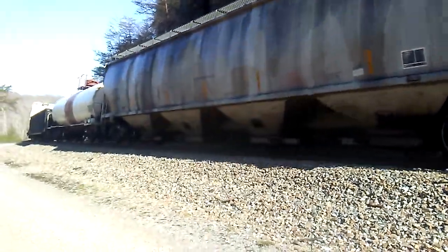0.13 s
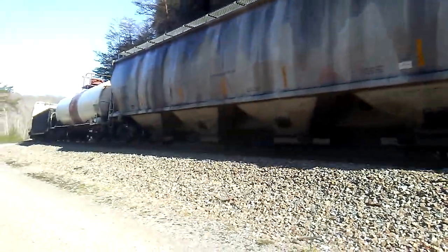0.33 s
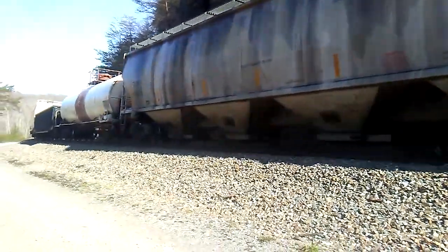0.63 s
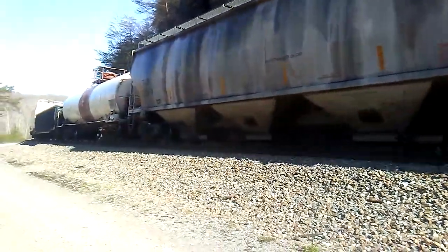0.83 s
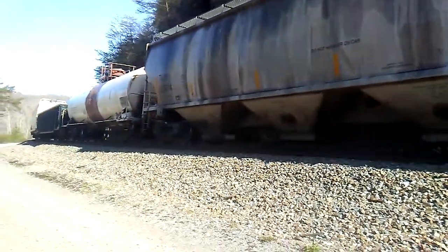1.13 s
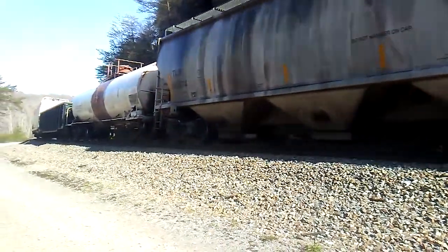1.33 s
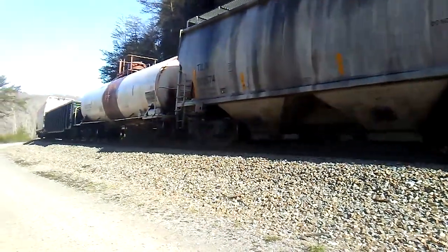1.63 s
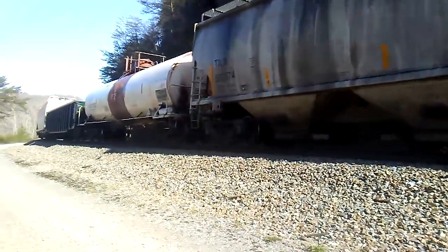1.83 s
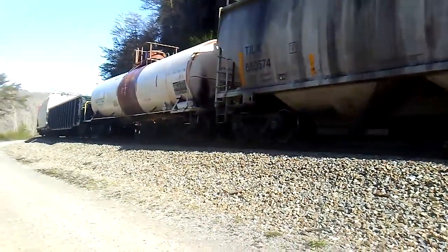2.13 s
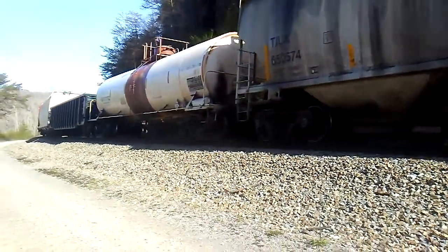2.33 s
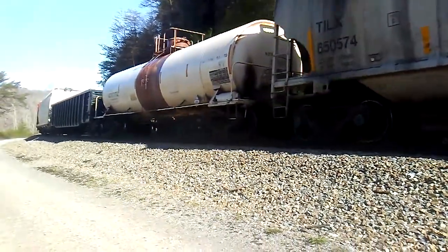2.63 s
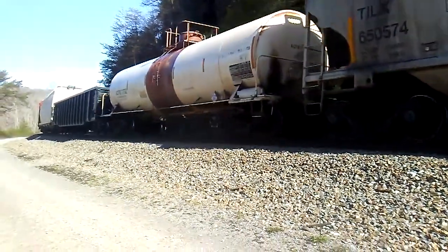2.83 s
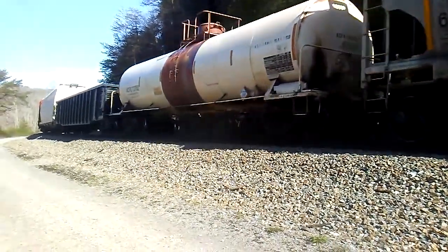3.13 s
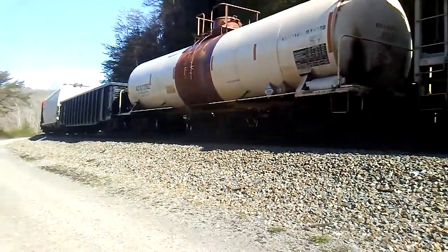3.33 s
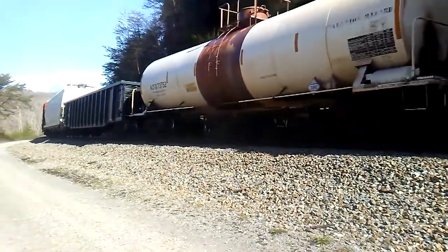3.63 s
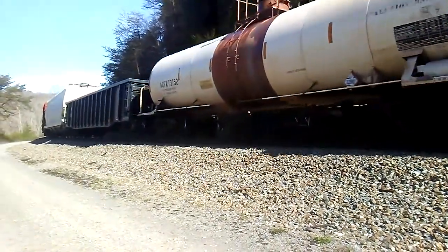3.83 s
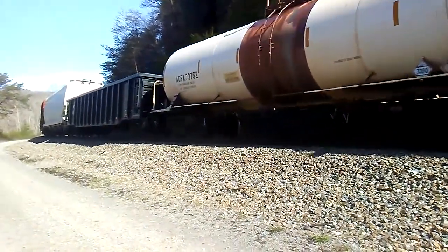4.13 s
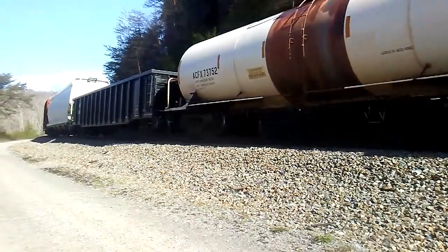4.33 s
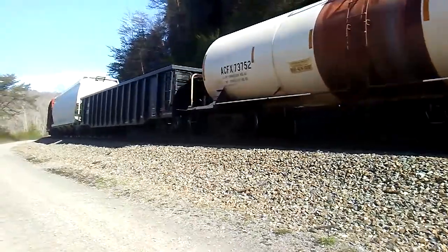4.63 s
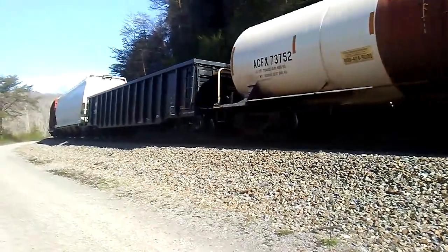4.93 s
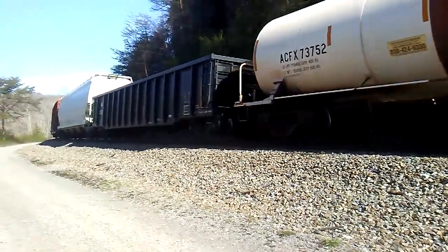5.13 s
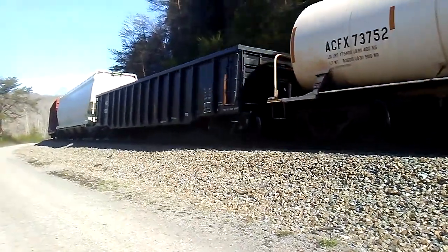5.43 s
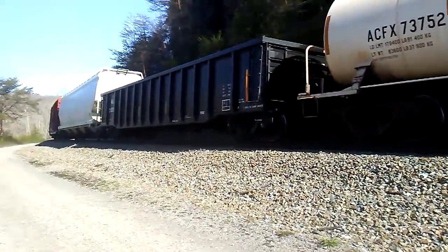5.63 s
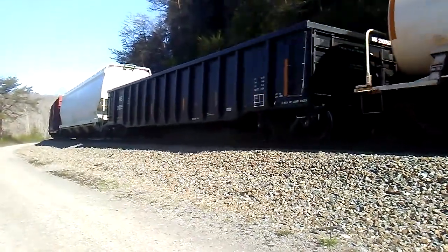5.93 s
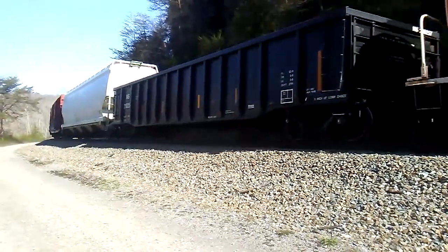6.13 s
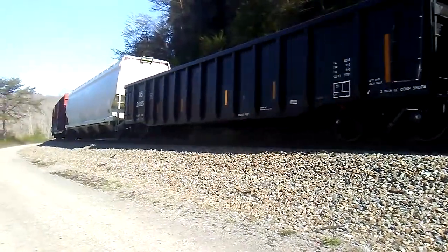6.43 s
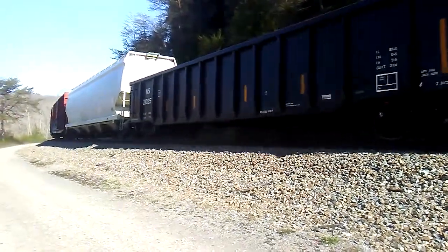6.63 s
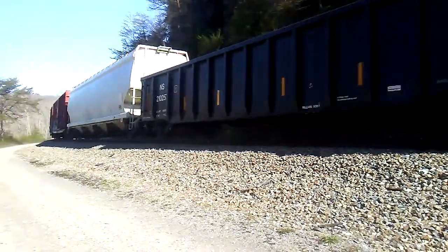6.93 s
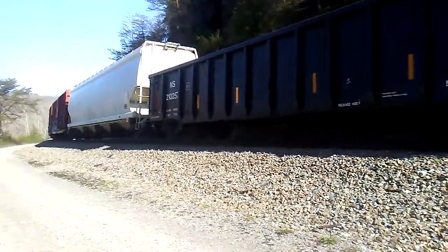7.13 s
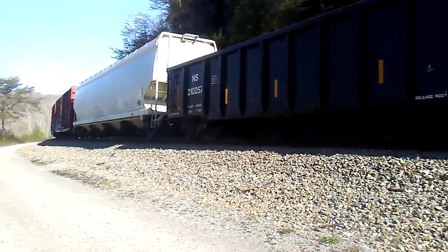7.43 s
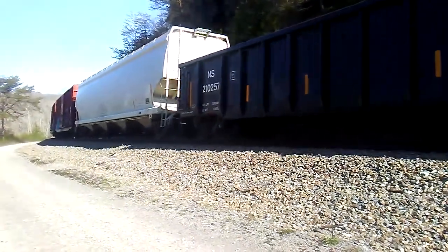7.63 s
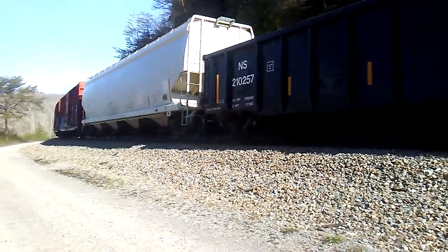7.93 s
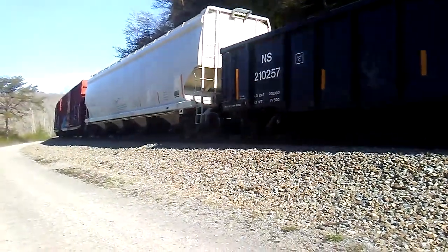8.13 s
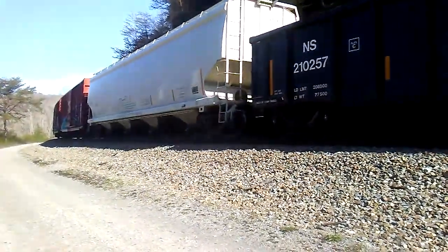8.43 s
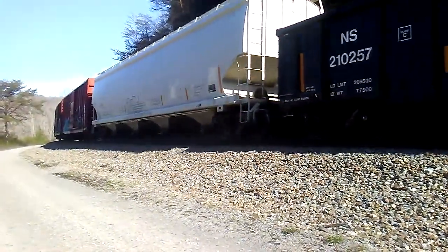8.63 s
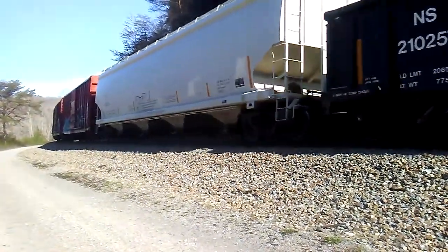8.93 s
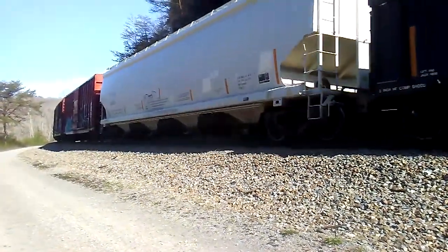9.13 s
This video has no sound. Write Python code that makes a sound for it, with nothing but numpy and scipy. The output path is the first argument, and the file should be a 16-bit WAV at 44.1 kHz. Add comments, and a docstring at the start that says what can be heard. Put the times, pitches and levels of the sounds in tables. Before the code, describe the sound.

Piercing, fluttering wheel squeals and harsh metallic grinding pass close by, then fade into low freight-train rumble with wind buffets and a few dull clanks.

```python
"""Slow freight train, close to the track

Freight cars roll slowly past a small camera whose microphone is 4 m from the squealing wheels at their nearest.
Coloured noise makes the ground rumble and the rail's roar; noise through resonances makes wheels ring and
gear clank. Flanges grind as swaying noise and lock into squeals, which are fluttering sine tones.
Random slaps on the microphone port make the gusts, and the camera limits and clips the loudest peaks."""
import sys
import numpy as np
from scipy import signal
from scipy.fft import rfft, irfft, next_fast_len
from scipy.io import wavfile
from scipy.ndimage import uniform_filter1d, minimum_filter1d, map_coordinates

SR = 44100
rng = np.random.default_rng(int(sys.argv[2]) if len(sys.argv) > 2 else 0)


def output_pcm(signal):
    """Save a mono or channel-first signal as 16-bit PCM at the path in sys.argv[1].

    Samples are clipped to [-1, 1] before scaling.
    """
    pcm = np.clip(np.atleast_2d(signal).T, -1, 1) * 32767
    wavfile.write(sys.argv[1], SR, np.round(pcm).astype(np.int16))


N = 409248

# gusts on the microphone: start_s, length_s, level_db
GUSTS = [(1.19, 1.17, -22.5), (1.54, 0.052, -12), (1.91, 0.087, -14.5), (2.969, 0.043, -18.5),
         (3.715, 0.23, -20.5), (7.176, 0.14, -19.5), (7.469, 0.043, -14.5), (7.531, .072, -12),
         (7.717, 0.13, -10.5), (7.847, 0.1, -8), (8.351, 0.081, -18)]
# spectrum of the gusts at the port: frequency_hz, density_db
BUFFET_SPECTRUM = [(30, -34), (70, -21), (170, -3), (260, 0), (420, -1.5), (620, -8.5), (1000, -18.5),
                   (2000, -51), (5000, -66)]
# spectrum of the rumble under the cars: frequency_hz, density_db
RUMBLE_SPECTRUM = [(25, -29), (42, -14), (62, -3), (95, -3.5), (135, -9.5), (180, 3), (225, 1.5), (330, 1),
                   (500, -10), (900, -13), (2000, -71)]
# rumble before its trim: time_s, level_db
RUMBLE_LEVEL = [(0, -26.5), (1.05, -29), (1.5, -22), (2.05, -22), (2.5, -24), (6.4, -25), (6.8, -21.5),
                (7.8, -23.5), (9.28, -25.5)]
# spectrum of the rail's roar: frequency_hz, density_db
ROAR_SPECTRUM = [(150, -23), (400, -5), (750, 2), (1050, 1), (1300, -3), (1700, -1.5), (2400, -3),
                 (3000, -8), (3800, -1.5), (4500, -29.5), (6500, -62), (12000, -53)]
# roar before its trim: time_s, level_db
ROAR_LEVEL = [(0.2, -19), (0.8, -31), (1.8, -18.5), (3.5, -20.5), (4.6, -25), (6.9, -25.5), (8.05, -30),
              (9.28, -25.5)]
# wheel modes rung by rolling: pitch_hz (wheel at rest), width_hz, relative_level_db
RIM_MODES = [(1595, 143, -5.5), (1908, 82, 2), (2193, 210, -7), (2588, 215, -5.5), (2774, 101, 4),
             (3340, 150, -7.5), (3540, 66, 1.5), (3857, 133, -5)]
# ringing of the wheels before its trim: time_s, level_db
RING_LEVEL = [(0, -6), (.8, -10), (1.5, -8), (2.95, -11.5), (3.3, -9.5), (3.7, -13), (5, -17), (6.65, -19),
              (7, -29.5), (8.05, -35), (8.25, -22.5), (9.28, -31.5)]
# clanks of the running gear: start_s, level_db, t60_s, knock_against_ring_db
CLANKS = [(4.728, -18, 0.26, 2.5), (6.14, -24, 0.14, 7), (6.703, -9, 0.46, -1.5), (8.948, -11, 0.37, 3.5)]
# low resonances of a clank: pitch_hz, width_hz, relative_level_db
KNOCK_MODES = [(188, 60, -5), (620, 160, -2.5), (880, 120, -5), (1410, 156, -7), (1760, 230, -5.5)]
# high resonances of a clank: pitch_hz, width_hz, relative_level_db
CLINK_MODES = [(2630, 300, -7.5), (3334, 130, 6.5), (3570, 120, 1), (3820, 68, 4.5)]
# wheel modes rung by the flange: pitch_hz (wheel at rest), width_hz, relative_level_db
FLANGE_MODES = [(5340, 54, -20), (6358, 64, 1), (7250, 130, 1), (8220, 116, 4), (9136, 107, 2),
                (10100, 330, -13), (11070, 71, -10.5), (12000, 150, -18)]
# spectrum of the flange scraping: frequency_hz, density_db
SCRAPE_SPECTRUM = [(3000, -7), (5200, -11), (6500, -2), (8400, -0.5), (9600, -5), (11500, -11),
                   (15500, -22)]
# spectrum of the finest hiss: frequency_hz, density_db
HISS_SPECTRUM = [(6000, -33), (10000, -16), (12500, -2.5), (14000, 3.5), (15600, 4)]
# steady contact of the flanges: time_s, grinding_db, fine_hiss_db
CONTACT = [(0, -9, -20), (.3, -4, -16), (.5, -8, -28), (1.25, -8, -26), (1.45, -17, -44), (1.9, -22.5, -43),
           (4, -31.5, -38), (6.65, -32, -41), (6.85, -52, -54), (8, -51.5, -52), (8.2, -31.5, -32),
           (9.28, -31.5, -36)]
# scrapes as a flange sways against the rail: start_s, length_s (until it lets go), level_db
SCRAPES = [(1.554, 0.075, -16), (2.004, 0.12, -15.5), (2.193, 0.15, -17), (2.49, 0.072, -21.5),
           (2.646, 0.11, -19.5), (2.823, 0.14, -23.5), (3.153, 0.2, -17), (3.47, 0.044, -22),
           (3.75, 0.098, -31), (4.077, 0.25, -23.5), (4.702, 0.1, -19.5), (4.882, 0.13, -29),
           (5.316, 0.27, -25.5), (6.16, 0.051, -29), (6.41, 0.11, -30.5), (7.02, 0.26, -41),
           (7.3, 0.28, -44)]
# modes that can squeal, on a wheel at rest: name -> pitch_hz
SQUEAL_HZ = {"howl": 979.5, "whine": 1908, "cry": 2790, "chirp": 3490, "squeak": 3840, "pipe": 5540, "keen":
             6260, "shriek": 7220, "screech": 8180, "whistle": 9130}
# a wheel locks into one mode: start_s, length_s, mode_name, level_db
SQUEALS = [(0, .26, "keen", -16), (0.01, 0.5, "screech", -13), (0.103, 0.52, "pipe", -26.5),
           (0.222, 0.28, "whistle", -20), (0.482, 0.25, "whine", -13), (0.481, .52, "shriek", -8.5),
           (.55, 0.48, "squeak", -15), (.62, 0.5, "whistle", -10), (.88, 0.26, "chirp", -19),
           (.85, 0.38, "keen", -18), (0.948, 0.51, "screech", -13.5), (1.1, 0.74, "whistle", -21.5),
           (1.3, 0.71, "cry", -17.5), (2.03, .21, "squeak", -20), (2.25, 0.8, "whine", -17),
           (3.041, 0.65, "howl", -21), (3.27, 0.19, "howl", -15), (3.451, 1.8, "cry", -25.5),
           (4.729, 0.17, "howl", -27), (5.282, 0.34, "screech", -24.5), (6.117, 0.64, "whistle", -36),
           (8.15, 0.82, "cry", -37), (8.342, 1.1, "whistle", -34)]
# bands that the camera takes out: centre_hz, half_width_hz, depth_db
NOTCHES = [(120.5, 20, -9), (4743, 400, -29.5)]

# pass of the squealing wheels: speed, nearest distance from the camera, moment when nearest
SPEED_M_PER_S, DISTANCE_M, NEAREST_S = 4.2, 4, 1.3
SCRAPE_ATTACK_S, SCRAPE_RELEASE_S = 0.042, 0.07  # pressing on; time constant of letting go
SCRAPE_HISS_DB, HISS_GROWS = -26, 0.48  # fine hiss of a scrape at 0 dB; its dB for each dB of the scrape
PORT_LIMIT = 0.74  # the largest push that the microphone port passes on
LOW_CUT_HZ, TOP_HZ = 35, 15780  # the camera's bass filter and band limit


def amp(db):
    """Decibels to gain."""
    return 10 ** (np.asarray(db) / 20)


def unit(x):
    """Scale to rms 1."""
    return x / np.sqrt(np.mean(x ** 2) + 1e-20)


def curves(rows):
    """One value per sample for each column after the time."""
    s, *columns = np.transpose(rows)
    return [np.interp(np.arange(N) / SR, s, column) for column in columns]


def wobble(rate):
    """A smooth random curve of rms 1, rate knots a second."""
    knots = rng.standard_normal(int(N * rate / SR) + 4)
    return unit(map_coordinates(knots, [np.arange(N) * rate / SR], order=2))


def filtered(x, response):
    """x times a response of frequency."""
    size = next_fast_len(N + SR // 2)
    spectrum = rfft(x, size) * response(np.fft.rfftfreq(size, 1 / SR))
    return irfft(spectrum, size)[:N]


def colour(points):
    """The response through (Hz, dB) points on a log axis."""
    f, db = np.transpose(points)
    return lambda hz: amp(np.interp(np.log(hz + 1), np.log(f), db))


def body(modes):
    """The response of (Hz, width, dB) resonances whose powers add."""
    def resonance_power(f, hz, width, db):
        return (amp(db) * f * width) ** 2 / ((hz * hz - f * f) ** 2 + (f * width) ** 2)
    return lambda f: np.sqrt(sum(resonance_power(f, *mode) for mode in modes))


def noise(response):
    """Fresh noise of rms 1 through a response."""
    return unit(filtered(rng.standard_normal(N), response))


def shimmer(x, patchy_db):
    """Small patches of time and frequency swell and fade at random within a sound; rms 1."""
    bins = signal.stft(x, nperseg=2048)[2]
    field = rng.standard_normal(bins.shape)
    field = uniform_filter1d(field, size=2, axis=0)  # across frequency
    field = uniform_filter1d(field, size=10, axis=1)  # along time
    patchy = bins * amp(patchy_db * unit(field))
    return unit(signal.istft(patchy, nperseg=2048)[1][:N])


def doppler():
    """Pitch factor of wheels that pass on a straight track."""
    along_m = SPEED_M_PER_S * (np.arange(N) / SR - NEAREST_S)
    leaving_m_per_s = SPEED_M_PER_S * along_m / np.hypot(along_m, DISTANCE_M)
    return 1 - leaving_m_per_s / 343  # speed of sound, m/s


def ringing(modes, swell_db, rate, patchy_db):
    """Wheel modes under random forcing: each swells on its own, and all shift with the wheels' motion."""
    ring = np.zeros(N)
    for hz, width, db in modes:
        # the exponential narrows the skirts of the resonance
        mode = noise(lambda f: body([(hz, width, 0)])(f) * np.exp(-np.abs(f / hz - 1) * 3))
        ring += amp(db + swell_db * wobble(rate)) * np.sqrt(width) * mode
    heard = np.cumsum(doppler())
    ring = shimmer(map_coordinates(ring, [heard], mode="mirror"), patchy_db)
    # the modes share one supply of energy: as one swells, the others give way
    power = np.abs(uniform_filter1d(ring ** 2, size=SR // 5))
    return ring / np.sqrt(power + 1e-9)


def wind(slap_rate=200, scatter_db=4.5):
    """Eddies slap the microphone port one after another in short, sputtering gusts."""
    t = np.arange(N) / SR
    force = sum(amp(db) * np.exp(-np.abs(2 * (t - s) / length - 1) ** 10) for s, length, db in GUSTS)
    gaps = rng.gamma(2, SR / slap_rate / 2, size=5000)  # samples; slap_rate is slaps a second
    at = np.cumsum(gaps).astype(int)
    strengths = amp(scatter_db * rng.standard_normal(len(at)))
    slaps = np.bincount(at, strengths, minlength=N)[:N]
    # each slap is a sudden push and a short swing of the port: the minimum-phase pulse of the spectrum
    size = 4096
    cepstrum = irfft(np.log(colour(BUFFET_SPECTRUM)(np.fft.rfftfreq(size, 1 / SR))))
    push = irfft(np.exp(rfft(2 * cepstrum[:size // 2], size) - cepstrum[0]))
    buffet = force * unit(signal.fftconvolve(slaps - slaps.mean(), push)[:N])
    # the port rounds off the hardest slaps, which stay dull
    rounded = PORT_LIMIT * np.tanh(buffet / PORT_LIMIT)
    return filtered(rounded, colour([(1200, 0), (4000, -40)]))


def rumble():
    """Loaded axles shake the sleepers and the car bodies: low noise of uneven level."""
    load_db, = curves(RUMBLE_LEVEL)
    level = amp(load_db + 2.0 + 1.6 * wobble(22))
    return level * shimmer(noise(colour(RUMBLE_SPECTRUM)), patchy_db=0.5)


def rolling():
    """Rough treads make the rail roar and the wheels ring."""
    roar_db, = curves(ROAR_LEVEL)
    ring_db, = curves(RING_LEVEL)
    judder = amp(0.21 * wobble(35))
    roar = amp(roar_db + 2) * shimmer(noise(colour(ROAR_SPECTRUM)), patchy_db=3.0)
    ring = amp(ring_db - 2.0) * ringing(RIM_MODES, swell_db=2.5, rate=14, patchy_db=3.5)
    return judder * (roar + ring)


def clanks(rise_s=0.024):
    """Heavy steel parts crash together with a short, rough swell and ring out."""
    out = np.zeros(N)
    knock, clink = noise(body(KNOCK_MODES)), noise(body(CLINK_MODES))
    for s, db, t60, knock_db in CLANKS:
        t = np.maximum(np.arange(N) / SR - s, 0)
        decay = amp(-60 * np.maximum(t - rise_s, 0) / t60)
        swell = np.minimum(t / rise_s, 1) * decay
        out += amp(db) * swell * (clink + amp(knock_db) * knock)
    # blunt, massive contacts put little into the treble
    rough = out * amp(0.54 * wobble(160))
    return filtered(rough, colour([(4200, -2.0), (6000, -33)]))


def flange_force():
    """Strength of grinding and fine hiss: steady contact plus scrapes that press on, hold and let go."""
    t = np.arange(N) / SR
    grind, hiss = amp(curves(CONTACT)) ** 2  # powers, which add
    for start, length, db in SCRAPES:
        attack = np.clip((t - start) / SCRAPE_ATTACK_S, 0, 1)
        release = np.exp(-np.maximum(t - start - length, 0) / SCRAPE_RELEASE_S)
        press = attack * release
        grind = grind + (amp(db) * press) ** 2
        hiss = hiss + (amp(SCRAPE_HISS_DB + HISS_GROWS * db) * press) ** 2
    return np.sqrt(grind), np.sqrt(hiss)


def grinding(grip_db=2.5):
    """Flanges scrape along the rail head and stir the high wheel modes."""
    grind, fine = flange_force()
    chatter = amp(0.66 * wobble(50))
    modes = amp(-1.5) * ringing(FLANGE_MODES, swell_db=2.5, rate=14, patchy_db=3.5)
    scrape = amp(-7.5) * shimmer(noise(colour(SCRAPE_SPECTRUM)), patchy_db=5.5)
    # the finest hiss follows quick changes of grip
    grip = amp(grip_db * wobble(55))
    hiss = fine * grip * shimmer(noise(colour(HISS_SPECTRUM)), patchy_db=3)
    return chatter * (grind * (modes + scrape) + hiss)


def squeals(flutter_db=3.5, waver=.0014, shrill_hz=8000):
    """Stick and slip sustains one mode; the tone stutters, and sinks as the wheel goes by."""
    out = np.zeros(N)
    grip, drift, shift = wobble(38), wobble(130), doppler()
    for start, length, mode, db in SQUEALS:
        hz = SQUEAL_HZ[mode]
        span = np.arange(max(int(start * SR), 0), min(int((start + length) * SR), N))
        own = span - rng.integers(N)  # every squeal stutters in its own way
        pitch_hz = hz * shift[span] * (1 + waver * drift[own])
        # low modes hold steadier
        stutter = amp(flutter_db * np.sqrt(hz / shrill_hz) * grip[own])
        tone = unit(stutter * np.sin(2 * np.pi * np.cumsum(pitch_hz) / SR))
        out[span] += amp(db) * signal.windows.tukey(len(span), .5) * tone
    return out


def scene():
    """The train and the wind at one microphone."""
    train = rumble() + rolling() + clanks() + grinding() + squeals()
    return (wind() + train)[None]


def record(dry):
    """The camera notches two bands, limits and clips peaks, and cuts deep bass and all above its band limit."""
    def notch(f):
        return amp(sum(db * np.exp(-((f - hz) / width) ** 4) for hz, width, db in NOTCHES))
    x = filtered(dry[0], notch)
    # a fast limiter catches most of each overload; what slips past it clips
    allowed = minimum_filter1d(np.minimum(1, 1.15 / (np.abs(x) + 1e-9)), size=SR // 1000)
    limited = x * uniform_filter1d(allowed, size=SR // 800)
    clipped = np.clip(limited, -.97, .97)
    return filtered(clipped, lambda hz: (hz < TOP_HZ) * hz ** 2 / (hz ** 2 + LOW_CUT_HZ ** 2))[None]


dry = scene()
out = record(dry)
output_pcm(out)
```